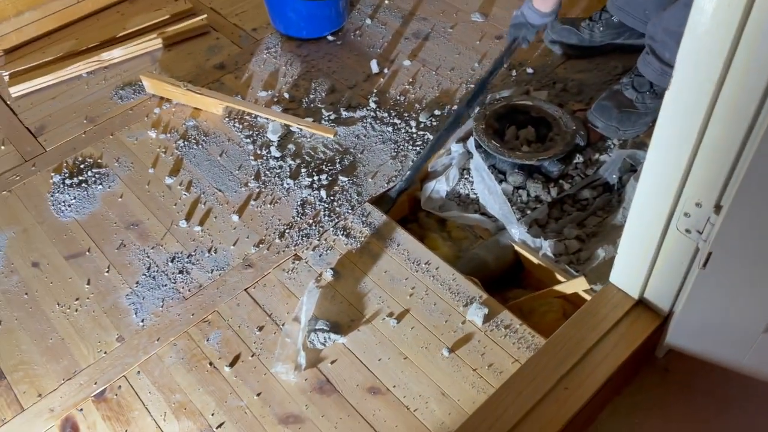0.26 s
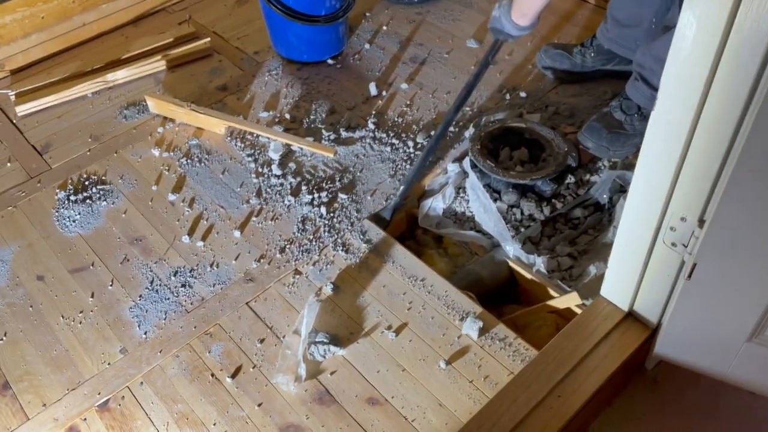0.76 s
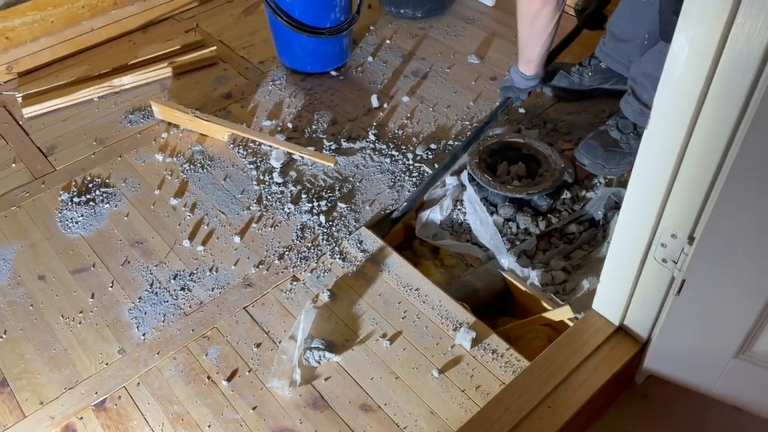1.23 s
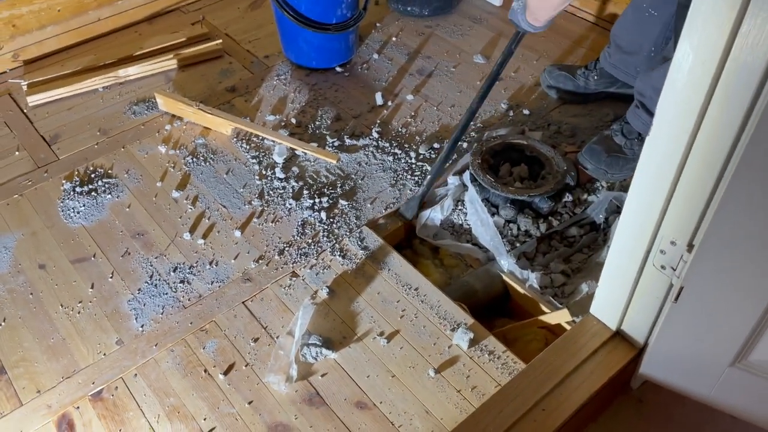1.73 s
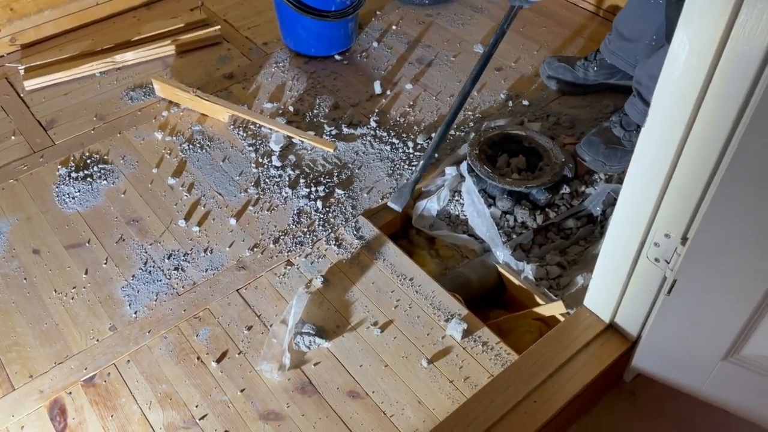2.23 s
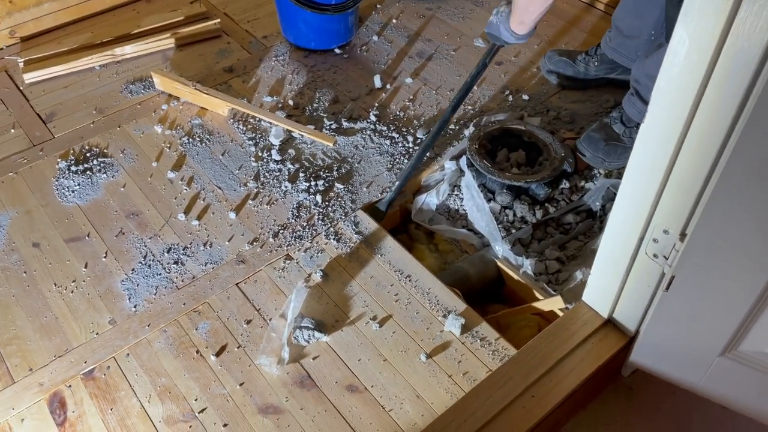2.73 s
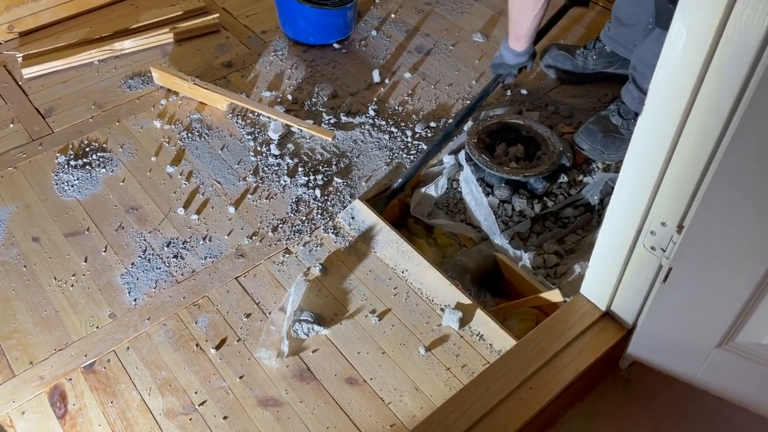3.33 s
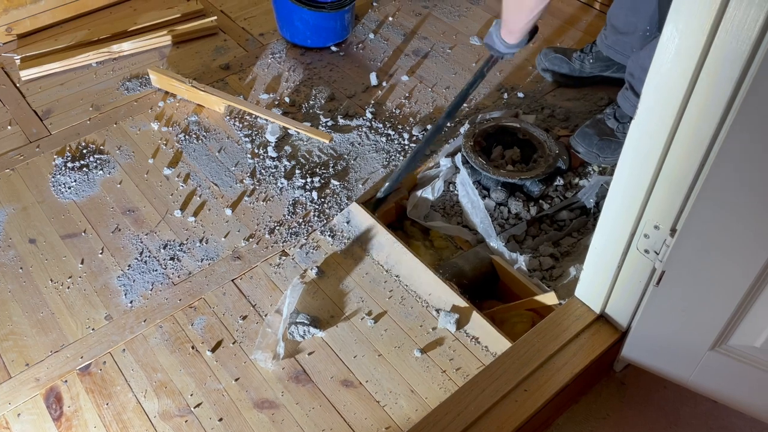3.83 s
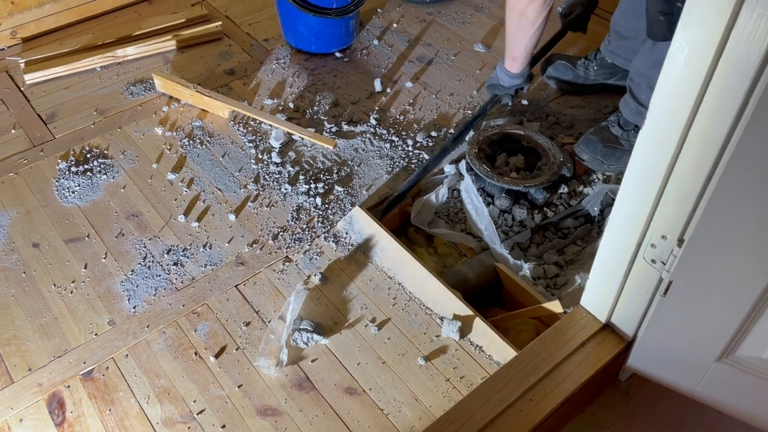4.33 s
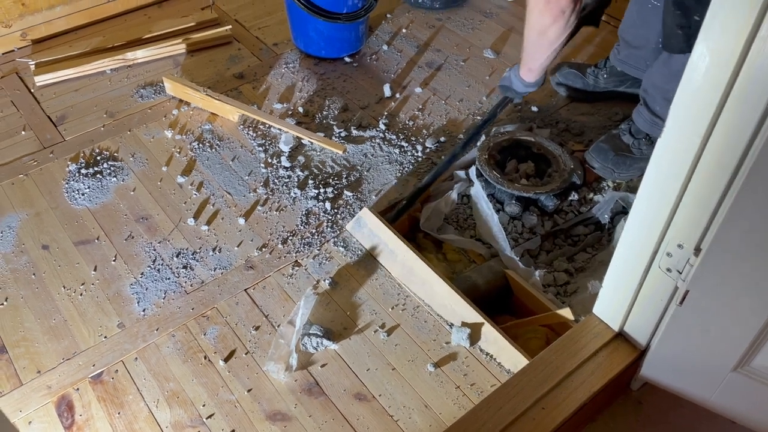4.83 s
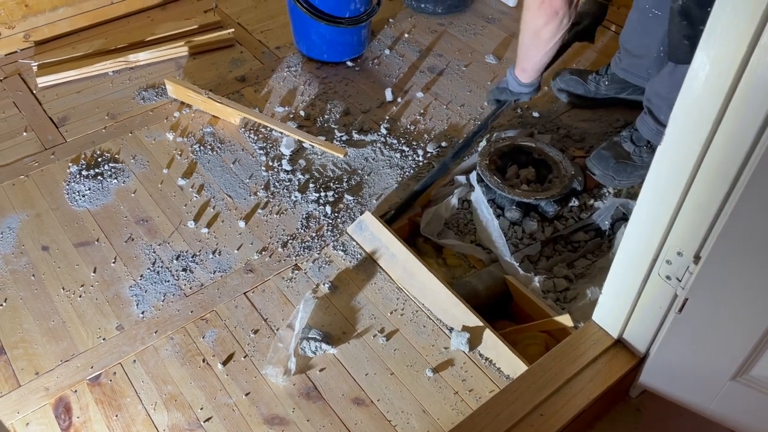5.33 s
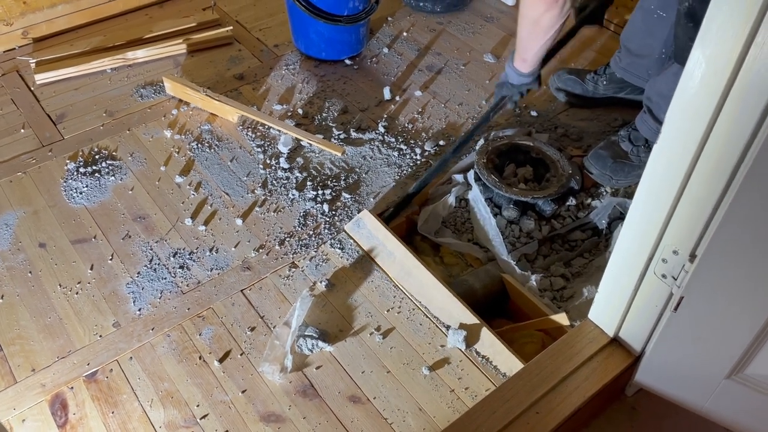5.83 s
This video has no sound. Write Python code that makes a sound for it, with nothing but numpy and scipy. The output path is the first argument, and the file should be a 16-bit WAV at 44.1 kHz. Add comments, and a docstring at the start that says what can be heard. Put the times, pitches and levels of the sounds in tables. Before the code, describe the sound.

A steel shovel works through broken concrete in a hole in a wooden floor, heard close in a small, quiet room with a short echo. Light gritty scrapes lead to a sharp knock and a heavy, hollow floor thud at 0.7 seconds, followed by small stones ticking down. Around 1.5 seconds the blade rasps with a faint, brief squeal, ending in another thud at 1.7. More knocks with deep thumps land at 2.6 and 3.2 seconds, with crunching grit between. A juddering scrape from 3.5 seconds ends in a strong thud at 3.8. A quick clatter of hits and a short metallic clang come near 4.2, and another cluster of stony cracks at 4.6. From 5 seconds the work is lighter, with softer bumps, scattered knocks and falling pebbles, closing with a short rasp near 6 seconds.

```python
"""Shovelling rubble in a small room

A steel shovel digs broken concrete out of a hole in a wooden floor. Stick-slip friction makes the
blade grind, judder and squeal; it knocks on chunks and rings when struck free. Thrusts end in thuds
that excite the modes of boards and joists, and loose stones clatter back. Two microphones listen."""
import sys
import numpy as np
from scipy import signal
from scipy.fft import rfft, irfft, next_fast_len
from scipy.io import wavfile
from scipy.ndimage import map_coordinates

SR = 44100
rng = np.random.default_rng(int(sys.argv[2]) if len(sys.argv) > 2 else 0)


def pcm_store(signal):
    """Save signal as 16-bit PCM."""
    levels = np.round(np.clip(np.atleast_2d(signal), -1, 1) * 32767)
    wavfile.write(sys.argv[1], SR, levels.astype(np.int16).T)


N = 268039
TIME = np.arange(N) / SR
STONE_WIDTH_SHARE, STONE_RING_DB = 0.3, 12  # a stone's resonance: bandwidth over frequency, and lift

# blows on the floor: t/s, swing level/dB, final swing f/Hz, board level/dB, joist level/dB, clunk level/dB
FLOOR_BLOWS = [(0.4885, -62, 187, -56, -27.5, -48), (0.6995, -6, 164.7, -18, -12.5, -32.5),
               (1.113, -28, 142, -56, -38, -44.5), (1.726, -8.5, 151, -17, -17.5, -31.5),
               (2.456, -28.5, 175, -63.5, -28, -46), (2.522, -26, 284, -37, -34, -49),
               (2.632, -8.5, 197, -21.5, -10.5, -28.5), (3.186, -11, 179, -32.5, -33, -35.5),
               (3.803, -5, 190.6, -19.5, -12.5, -20.5), (4.124, -19, 204, -27, -25, -55),
               (4.619, -21, 206, -24, -38, -29.5), (5.046, -26, 127, -32.5, -20.5, -41),
               (5.522, -30.5, 213, -47, -55, -51), (5.616, -28, 220, -44, -43, -41)]
# spectral envelopes: f/Hz, relative level/dB
GRIND_SPECTRUM = [(150, -8), (450, 3.5), (1100, 3), (1800, -0.5), (2900, -6), (6000, -18), (16000, -31.5)]  # steel sliding on stone
RUMBLE_SPECTRUM = [(20, -45.5), (47, 4.5), (65, 4.5), (95, -1), (180, 0.5), (280, -6.5), (450, -12.5),
                   (1000, -48)]  # rubble drumming on the floor
BODY_SPECTRUM = [(120, -19), (350, 2), (700, 1.5), (1150, 3), (1700, -8), (4000, -68)]  # dull part of an impact
CRACK_SPECTRUM = [(700, -11.5), (1500, -0.5), (2300, 2.5), (3500, 0), (4600, -0.5), (6000, -11),
                  (9000, -16)]  # hard part of an impact
FIZZ_SPECTRUM = [(3500, -7.5), (6500, -4), (9000, 7.5), (11000, -2), (14000, 2.5), (16000, -8.5)]  # splinters


def amp(db):
    """Amplitude ratio of a level in decibels."""
    return 10 ** (np.asarray(db) / 20)


def unit(x):
    """Normalisation to rms 1."""
    return x / np.sqrt(np.mean(x ** 2) + 1e-20)


def read(points, hz):
    """Interpolation on a logarithmic frequency axis."""
    f, value = np.transpose(points)
    return np.interp(np.log(hz + 1), np.log(f + 1), value)


def add(mix, s, sound):
    """Superposition of a sound starting at s seconds."""
    part = mix[max(0, round(s * SR)):][:len(sound)]
    part += sound[:len(part)]


def colour(x, spectrum, peaks=(), size=2048):
    """Minimum-phase filter of unit power: an envelope plus resonances (f/Hz, width/Hz, lift/dB)."""
    hz = abs(np.fft.fftfreq(size, 1 / SR))
    db = read(spectrum, hz) + sum(lift / (1 + (2 * (hz - f) / width) ** 2) for f, width, lift in peaks)
    response = np.exp(np.conj(signal.hilbert(np.log(amp(db)))))
    taps = np.fft.ifft(response).real[:size // 2]
    return signal.fftconvolve(x, taps / np.linalg.norm(taps))[:len(x)]


def wander(rate):
    """Random fluctuation of rms 1, interpolated between rate values a second."""
    steps = rng.standard_normal(N // 10)
    return unit(np.interp(TIME * rate, np.arange(len(steps)), steps))


def grains(rate, spread_db):
    """Poisson impulses, rate a second: many small, a few large."""
    out = np.zeros(N)
    at = np.flatnonzero(rng.random(N) < rate / SR)
    draw = rng.laplace(size=N)[at]
    out[at] = np.sign(draw) * amp(spread_db * np.minimum(abs(draw), 4))
    return unit(out)


def burst(spectrum, decay, span, peaks=(), crumble=0.026, linger=5):
    """Brittle crushing: a puff of noise, then spiky crumbs, with the energy of span seconds at rms 1."""
    t = TIME[:SR // 6]
    puff, crumbs = rng.standard_normal((2, len(t)))
    force = puff * np.exp(-t / decay) + crumble * crumbs ** 3 * np.exp(-t / (linger * decay))
    x = colour(force * (1 - np.exp(-2 * t / decay)), spectrum, peaks)
    return x * np.sqrt(span * SR) / np.linalg.norm(x)


def ring(modes, rise_s, detune):
    """Damped free vibration: modes swell from rest and die, detuned a little by where the blow lands."""
    t = TIME[:SR]
    out = np.zeros(SR)
    for hz, db, t60 in modes:
        detuned_hz = hz * (1 + detune * rng.uniform(-0.49, 1))
        out += amp(db - 60 * t / t60) * np.sin(2 * np.pi * detuned_hz * t)
    return out * (1 - np.exp(-t / rise_s))


def pushes(layer, fall_db_per_s, attack_s=0.015, touch_db=-52.5, build_share=0.67):
    """Loading and yield: a layer's gain builds in pushes above a light touch, until the heap gives way."""
    # pushes through the heap: t/s, duration/s, grind level/dB, grit level/dB, weight level/dB
    strokes = [(0.005, 0.059, -43, -32.5, -40), (0.344, 0.085, -31, -28, -30),
               (0.471, 0.044, -26, -25, -42), (0.586, 0.095, -26.5, -24.5, -26),
               (0.907, 0.12, -49.5, -37.5, -33.5), (1.048, 0.052, -38.5, -30.5, -42),
               (1.294, 0.06, -51.5, -40.5, -49), (1.386, 0.21, -31, -30.5, -24.5),
               (1.633, 0.053, -55, -48, -38), (2.497, 0.12, -29.5, -32, -27),
               (2.902, 0.11, -40.5, -32.5, -32), (3.057, 0.2, -35.5, -25, -33),
               (3.33, 0.08, -34, -33.5, -36), (3.495, 0.14, -36.5, -32.5, -27.5),
               (3.697, 0.081, -23, -25.5, -24), (3.958, 0.15, -39, -37, -27.5),
               (4.055, 0.12, -28, -20.5, -46), (4.527, 0.066, -23.5, -19.5, -20),
               (4.729, 0.15, -40, -50.5, -37.5), (4.957, 0.043, -29.5, -35.5, -33),
               (5.181, 0.094, -37.5, -37, -35), (5.401, 0.083, -37, -31.5, -33.5),
               (5.546, 0.11, -44.5, -30.5, -67), (5.799, 0.03, -39, -31.5, -40),
               (5.879, 0.15, -39.5, -34.5, -29.5)]
    out, t = np.zeros(N), TIME[:SR]
    for s, length, grind_db, grit_db, weight_db in strokes:
        db = {"grind": grind_db, "grit": grit_db, "weight": weight_db}[layer]
        build_db = build_share * max(grind_db - touch_db, 0) * np.minimum(t / length - 1, 0)
        release_db = fall_db_per_s * np.maximum(t - length, 0)
        add(out, s, np.minimum(t / attack_s, 1) * amp(db + build_db - release_db))
    return out


def air(level_db=-58):
    """Ambient noise: a faint low hush, partly coherent between the microphones."""
    # still air: f/Hz, relative level/dB
    spectrum = [(50, 2), (100, -10), (16000, -47)]
    hush = np.array([colour(rng.standard_normal(N), spectrum, size=8192) for _ in range(2)])
    return amp(level_db) * (hush + hush.mean(0)) / 2


def scrape(grind_db=-4, grit_db=-10, pebbles_db=-9.5, slip_db=4, slips_per_s=130, bite_db=-42):
    """Stick-slip friction: the blade crushes grit and rolls stones; a weak force only shifts dust."""
    # loose grit: f/Hz, relative level/dB
    grit_spectrum = [(1000, -46.5), (2200, -13.5), (3400, 9), (4700, 0.5), (6200, -2.5), (11000, 0),
                     (14000, -1.5), (16000, -10)]
    force = pushes("grind", fall_db_per_s=200) + settling()
    bite = np.clip(force / amp(bite_db), 0, 1)
    slips = amp(slip_db * np.minimum(wander(slips_per_s), 2))
    crushing = unit(slips * grains(rate=4500, spread_db=2.8))
    dust = rng.standard_normal(N)
    drive = bite * crushing + np.sqrt(1 - bite ** 2) * dust
    grinding = amp(grind_db) * force * colour(drive, GRIND_SPECTRUM)
    grit = colour(unit(slips * grains(rate=900, spread_db=2.1)), grit_spectrum)
    loose = amp(grit_db) * grit + amp(pebbles_db) * pebbles()
    return grinding + pushes("grit", fall_db_per_s=196) * loose


def pebbles(sizes=10, decay_cycles=1.8):
    """Heavily damped oscillators: each size of pebble ticks at its own pitch for a few cycles."""
    out, t = np.zeros(N), TIME[:SR // 50]
    for hz in np.geomspace(2300, 4900, sizes):
        tick = np.sin(2 * np.pi * hz * t) * np.exp(-hz * t / decay_cycles)
        out += signal.oaconvolve(grains(rate=30, spread_db=3), tick)[:N]
    return unit(out)


def rumble(level_db=-3):
    """Forced vibration: with each push, rolling chunks and the weight on the shovel drum on the floor."""
    drumming = colour(grains(rate=400, spread_db=1.5), RUMBLE_SPECTRUM, size=16384)
    return amp(level_db) * pushes("weight", fall_db_per_s=109) * drumming


def ticks(decay_s=0.0016, fizz_db=-8):
    """Light impacts: loose stones drop on the heap, each resonating briefly at its own pitch."""
    # falling stones: t/s, level/dB, f/Hz
    drops = [(0.047, -44, 3880), (0.058, -32, 3360), (0.0785, -43, 3700), (0.21, -44, 3220),
             (0.3045, -35, 3050), (0.551, -25.5, 3080), (0.9304, -26, 3970), (0.955, -29, 4150),
             (0.9873, -24, 4400), (1.063, -26.5, 3240), (1.112, -27.5, 1750), (1.15, -25.5, 3430),
             (1.338, -36.5, 2290), (2.847, -31, 3520), (3.079, -27.5, 4270), (3.9572, -28, 2870),
             (3.976, -26, 3000), (4.033, -33, 2920), (4.47, -36.5, 4070), (5.236, -24, 3270),
             (5.372, -30.5, 3930), (5.433, -29.5, 4000), (5.4588, -22, 4500), (5.4708, -20, 3600),
             (5.485, -27, 4300), (5.571, -27.5, 3550), (5.599, -29, 4760), (5.671, -28, 4550),
             (5.78, -27.5, 3740)]
    out = np.zeros(N)
    for s, db, hz in drops:
        stone = [(hz, STONE_WIDTH_SHARE * hz, STONE_RING_DB)]
        crack = burst(CRACK_SPECTRUM, decay_s, span=0.0021, peaks=stone)
        fizz = amp(fizz_db) * burst(FIZZ_SPECTRUM, decay_s, span=0.0023)
        add(out, s, amp(db) * (crack + fizz))
    return out


def thuds(swell_s=0.011, glide=1.275, glide_s=0.0046, lift_db=1):
    """Dispersion: fast bending waves arrive first, so the floor's swing drops in pitch; modes ring on."""
    # modes: f/Hz, level/dB, T60/s
    board_modes = [(112.5, 0, .22), (144, 5, 0.24), (181, 5.5, .38), (218, -2, 0.18), (272, -7.5, 0.48),
                   (361, -15, 0.4), (559, -15, 0.4)]
    joist_modes = [(48.5, 1, 0.72), (69.3, -9, .6), (88.8, 0, 0.42)]
    rammed_shovel_modes = [(520, 0, .08), (720, -4, .07), (1035, 1, .055), (1115, -3, .06)]
    out, t = np.zeros(N), TIME[:SR]
    for s, swing_db, hz, board_db, joist_db, clunk_db in FLOOR_BLOWS:
        cycles = hz * (t + glide * glide_s * (1 - np.exp(-t / glide_s)))
        swing = np.sin(2 * np.pi * cycles) * (t / swell_s * np.exp(1 - t / swell_s)) ** 2
        add(out, s, amp(swing_db + lift_db) * swing)
        add(out, s, amp(board_db) * ring(board_modes, rise_s=0.0017, detune=0.025))
        add(out, s, amp(joist_db + lift_db) * ring(joist_modes, rise_s=0.0095, detune=0.032))
        rattle = burst(RUMBLE_SPECTRUM, decay=0.017, span=0.045, peaks=[(680, 490, 17)], crumble=0)
        add(out, s, amp(board_db) * rattle)  # rubble jumps with the boards
        add(out, s, amp(clunk_db) * ring(rammed_shovel_modes, rise_s=0.00038, detune=0.037))
        add(out, s, amp(clunk_db) * burst(BODY_SPECTRUM, decay=0.0097, span=0.083))
    return out


def settling(relative_db=-23, fall_db_per_s=28):
    """Exponential relaxation: gain of the rubble that keeps shifting after the boards shake it."""
    out = np.zeros(N)
    for s, _, _, board_db, _, _ in FLOOR_BLOWS:
        add(out, s, amp(board_db + relative_db - fall_db_per_s * TIME))
    return out


def knocks(heft=0.38, body_db=-2, crack_db=-1, fizz_db=-1):
    """Inelastic impact: steel crushes stone; body and crack carry the stone's pitch, splinters fizz."""
    # steel meeting stone: t/s, level/dB, brightness/dB, contact time/s, f/Hz
    impacts = [(0.4911, -16, -5, 0.0034, 1500), (0.614, -22.5, -4.5, 0.017, 2750),
               (0.6935, -13.5, 1.5, 0.0016, 3500), (0.697, -11.5, -8, 0.00081, 910),
               (1.4289, -30, -16, 0.0018, 2400), (1.573, -21.5, -2, 0.0028, 1600),
               (1.6909, -19.5, -6.5, 0.014, 3320), (1.7221, -16, -9.5, 0.00083, 2730),
               (2.457, -31, -13.5, 0.0047, 1500), (2.6301, -12.5, -3, 0.002, 990),
               (3.184, -8.5, 0.5, 0.0056, 1310), (3.1998, -11, -5, 0.0028, 810),
               (3.262, -20, 0.5, 0.0011, 2280), (3.3743, -19.5, 5.5, 0.0029, 1110),
               (3.5044, -26.5, -10, 0.0048, 1650), (3.787, -29, -8, 0.0025, 4100),
               (3.802, -13.5, -5, 0.0032, 1070), (4.121, -20, -16, 0.0013, 1150),
               (4.1439, -19.5, 2, 0.0014, 3520), (4.1524, -20, 5, 0.0018, 3070),
               (4.1717, -15, 3.5, 0.0035, 1140), (4.213, -14, -5.5, 0.00074, 3520),
               (4.569, -20.5, 7, 0.0022, 3200), (4.581, -21.5, 5.5, 0.0016, 3370),
               (4.5996, -21, 4.5, 0.0016, 1500), (4.604, -9.5, -23, 0.0019, 3300),
               (4.611, -13.5, -22, 0.0014, 1260), (4.629, -17.5, -24, 0.0075, 1100),
               (4.9619, -34, 7.5, 0.0041, 2980), (5.0424, -20.5, -6, 0.0049, 1060),
               (5.204, -26, -12, 0.0016, 1280), (5.2254, -21.5, -10, 0.00084, 2700),
               (5.2778, -29.5, 4, 0.0017, 1100), (5.5194, -19, 0.5, 0.0013, 3400),
               (5.6194, -18.5, 3, 0.00041, 1030), (5.796, -18, -0.5, 0.00068, 4000),
               (6.001, -23.5, -27, 0.0031, 2760)]
    out = np.zeros(N)
    for s, db, bright_db, contact, hz in impacts:
        stone = [(hz, STONE_WIDTH_SHARE * hz, STONE_RING_DB)]
        body_gain = amp(body_db + heft * db)  # small stones have little body
        body = body_gain * burst(BODY_SPECTRUM, 1.62 * contact, span=0.0041, peaks=stone)
        crack = amp(crack_db) * burst(CRACK_SPECTRUM, 0.82 * contact, span=0.003, peaks=stone)
        fizz = amp(fizz_db + bright_db) * burst(FIZZ_SPECTRUM, 0.67 * contact, span=0.0015)
        add(out, s, amp(db) * (body + crack + fizz))
    return out


def rasp(judder_per_s=68, uneven=0.45, spread_db=1.5, decay_share=0.32, sing_width_hz=260, sing_db=7):
    """Relaxation oscillation: pushed hard, the blade judders, and each jerk excites its resonances."""
    # blade forced over rubble: t/s, duration/s, level/dB, emphasised f/Hz
    drags = [(1.403, 0.15, -38.5, 745), (1.498, 0.12, -31.5, 1140), (3.478, 0.23, -39, 1070),
             (3.601, 0.059, -34.5, 2220), (3.717, 0.14, -28, 2270), (5.858, 0.18, -36.5, 2760)]
    # resonances of the blade pressed into the heap: f/Hz, width/Hz, lift/dB
    resonances = [(738, 50, 13), (1150, 100, 15), (1510, 90, 11), (2180, 110, 16), (2750, 160, 12),
                  (3310, 130, 12), (4140, 170, 12), (4880, 200, 15)]
    jerks = np.cumsum(judder_per_s * np.exp(uneven * wander(judder_per_s))) / SR
    strength = amp(spread_db * rng.standard_normal(N))[jerks.astype(int)]
    drive = unit(strength * np.exp(-(jerks % 1) / decay_share) * rng.standard_normal(N))
    warped_index = np.cumsum(1 + 0.008 * wander(rate=24))  # the moving contact shifts the resonances
    out = np.zeros(N)
    for s, length, db, hz in drags:
        blade = colour(drive, GRIND_SPECTRUM, resonances + [(hz, sing_width_hz, sing_db)])
        out += swell(s, length, db) * map_coordinates(blade, [warped_index], order=3, mode="mirror")
    return out


def swell(s, length, db):
    """Half-sine envelope that starts at s seconds and peaks at db."""
    return amp(db) * np.sin(np.pi * np.clip((TIME - s) / length, 0, 1))


def squeal():
    """Friction-excited vibration: the blade's edge sings on stone in narrow bands of noise."""
    # edge sliding on stone: t/s, duration/s, level/dB
    slides = [(1.535, 0.093, -36.5)]
    # partials of the edge: f/Hz, width/Hz, level/dB
    partials = [(4900, 170, -7), (13100, 450, -12), (14300, 500, -11)]
    tone = sum(amp(db) * wander(2 * width) * np.sin(2 * np.pi * hz * TIME) for hz, width, db in partials)
    return sum(swell(*slide) for slide in slides) * unit(tone)


def clangs():
    """Free vibration: knocked clear, the blade rings in its inharmonic modes."""
    # blows that free the blade: t/s, level/dB
    blows = [(4.102, -37.5), (4.171, -23)]
    # modes of the free blade: f/Hz, level/dB, T60/s
    blade_modes = [(590, -1, .07), (732, -2, .8), (745, 5, .11), (850, -2, .07), (1175, -1, .09)]
    out = np.zeros(N)
    for s, db in blows:
        add(out, s, amp(db) * ring(blade_modes, rise_s=0.00017, detune=0.017))
    return out


def room(x, wet_db=-2, onset_s=0.00042, reflections_per_s=3000):
    """Reverberation: sparse reflections decay band by band, partly coherent at the two microphones."""
    # reverberation time: f/Hz, T60/s
    decay_times = [(180, 0.63), (420, 0.72), (1100, 0.15), (3000, 0.11), (15000, 0.3)]
    # likeness of the left and right reflections: f/Hz, correlation coefficient
    correlation = [(100, 0.99), (500, 0.026), (1100, -0.61), (2400, 0.039), (5000, -0.68), (8500, 0.98),
                   (13000, 0.96)]
    taps = rng.choice([-1., 1.], (2, SR)) * (rng.random((2, SR)) < reflections_per_s / SR)
    hz, at, bands = signal.stft(taps, SR, nperseg=256)
    alike = np.clip(read(correlation, hz), -1, 1)[:, None]
    bands = np.array([bands[0], alike * bands[0] + np.sqrt(1 - alike ** 2) * bands[1]])
    t60 = read(decay_times, hz)[:, None]
    tail = signal.istft(bands * amp(-60 * at / t60) / np.sqrt(t60), SR, nperseg=256)[1][:, :SR]
    tail *= 1 - np.exp(-(TIME[:SR] / onset_s) ** 2)
    tail /= np.linalg.norm(tail, axis=1, keepdims=True)
    # the floor radiates its bass close to the microphones, so the bass is drier
    above_bass = signal.sosfilt(signal.butter(1, 260, "high", fs=SR, output="sos"), x)
    return x + amp(wet_db) * signal.fftconvolve(above_bass[None], tail, axes=1)[:, :N]


def scene():
    """Superposition: all the digging sounds in one room, over still air."""
    return air() + room(knocks() + ticks() + thuds() + scrape() + rasp() + squeal() + clangs() + rumble())


def record(dry, ceiling=0.98, cutoff_hz=15950):
    """Two-microphone stereo: phase and level differ between channels; soft saturation, then a low-pass."""
    # phase lead of the left microphone: f/Hz, phase/rad
    left_lead = [(100, 0), (2200, .2), (2900, .8), (4800, .5), (5800, -1.1), (6800, -.9), (8600, -3.14),
                 (10300, -4.3), (12500, -6.2)]
    # left minus right: f/Hz, level/dB
    left_excess = [(500, 0.5), (1100, 2), (2300, 1.5), (3400, 0.5), (6000, 0.5)]
    size = next_fast_len(N + SR // 4)
    hz = np.fft.rfftfreq(size, 1 / SR)
    balance = amp(read(left_excess, hz) / 2)
    responses = np.array([balance, np.exp(-1j * read(left_lead, hz)) / balance])
    heard = irfft(rfft(dry, size) * responses, size)[:, :N]
    rounded = heard / (1 + (heard / ceiling) ** 8) ** (1 / 8)
    low_pass = signal.firwin(255, cutoff_hz, window=("kaiser", 8), fs=SR)
    return signal.oaconvolve(rounded, low_pass[None], "same")


dry = scene()
out = record(dry)
pcm_store(out)
```